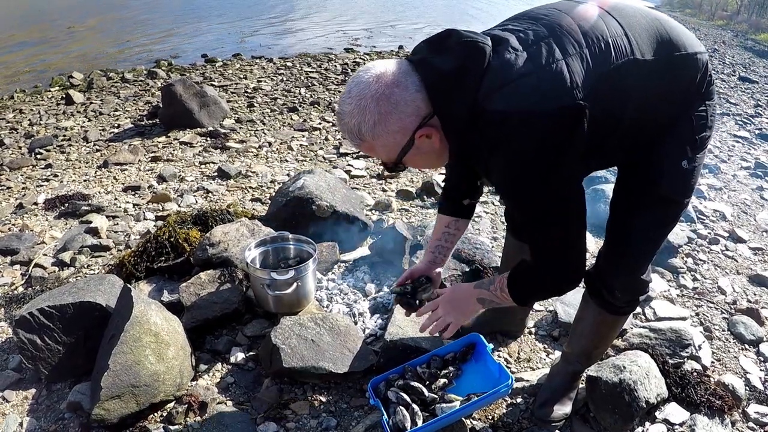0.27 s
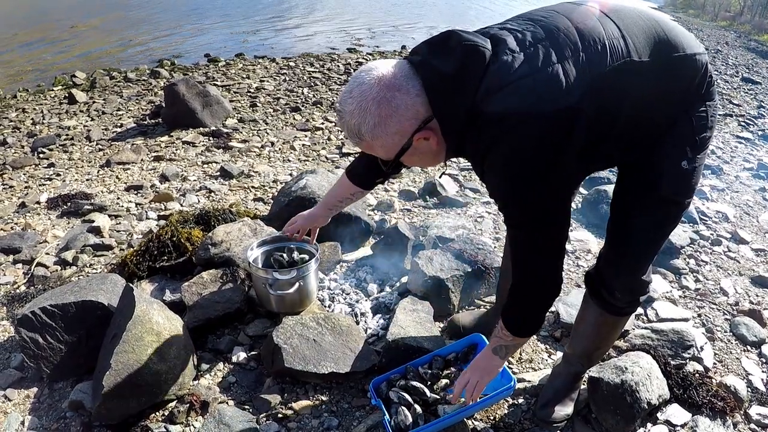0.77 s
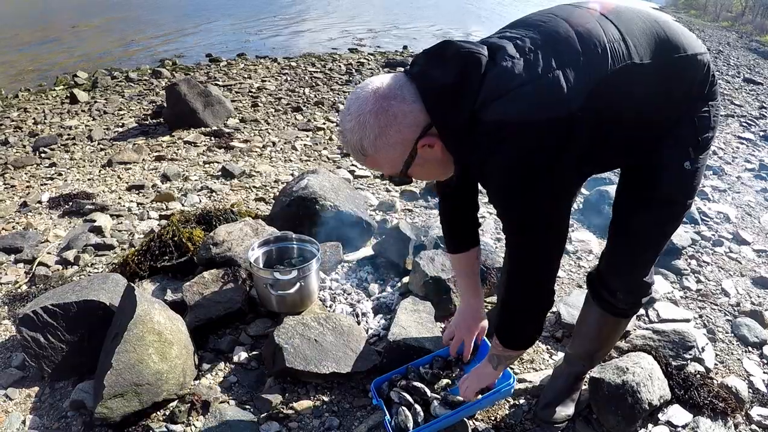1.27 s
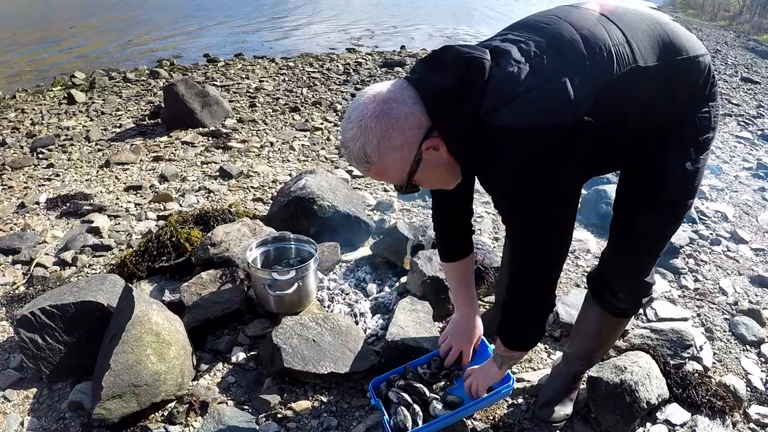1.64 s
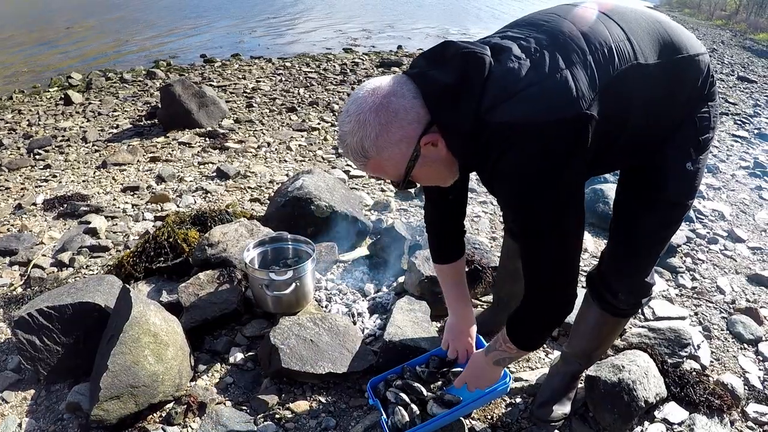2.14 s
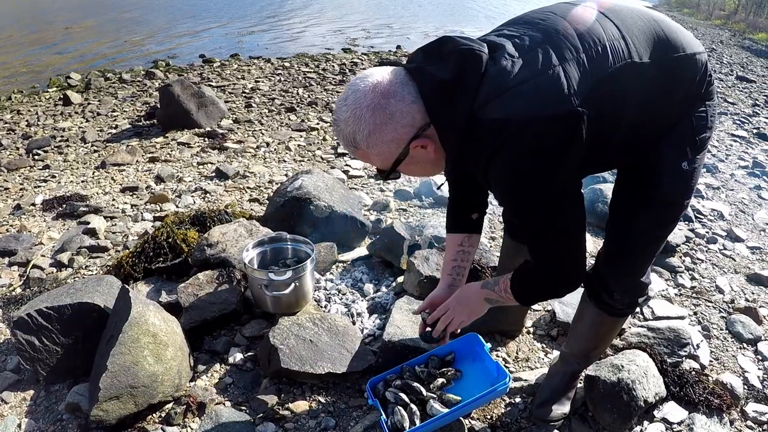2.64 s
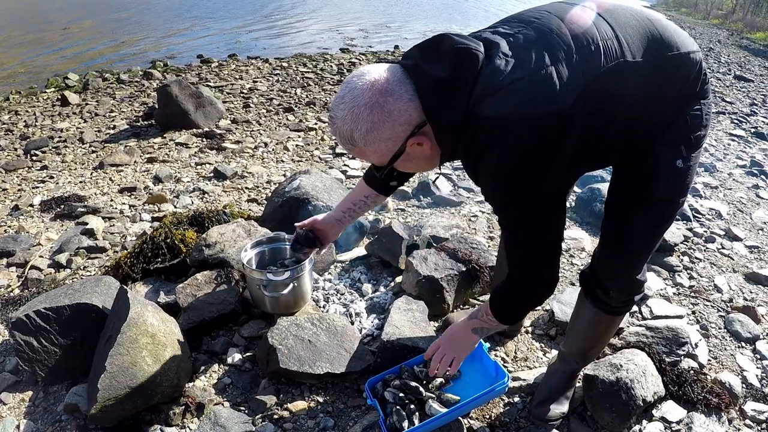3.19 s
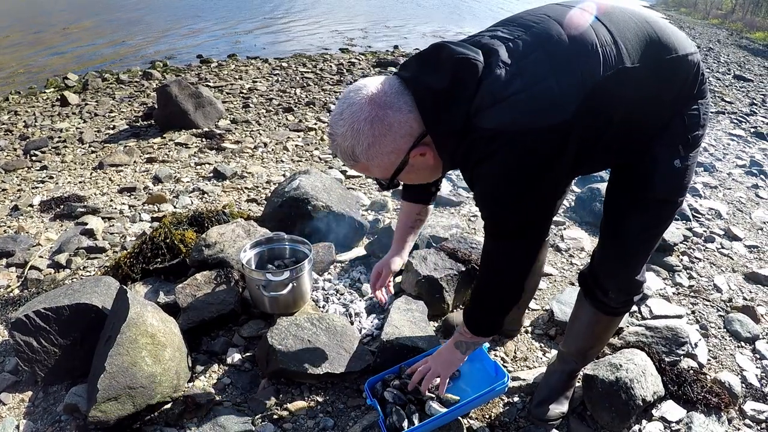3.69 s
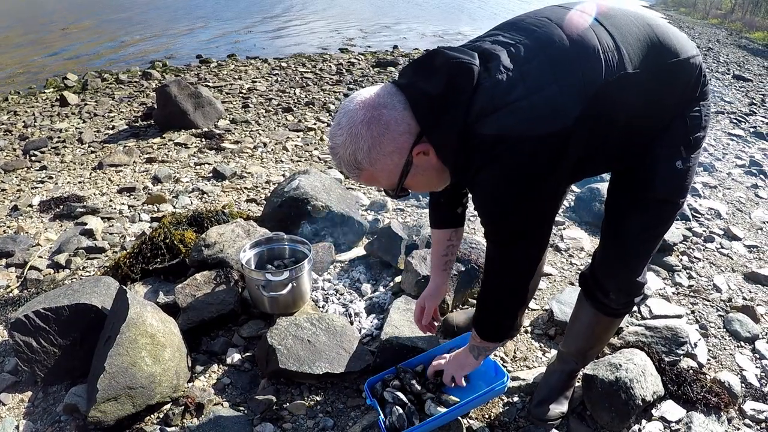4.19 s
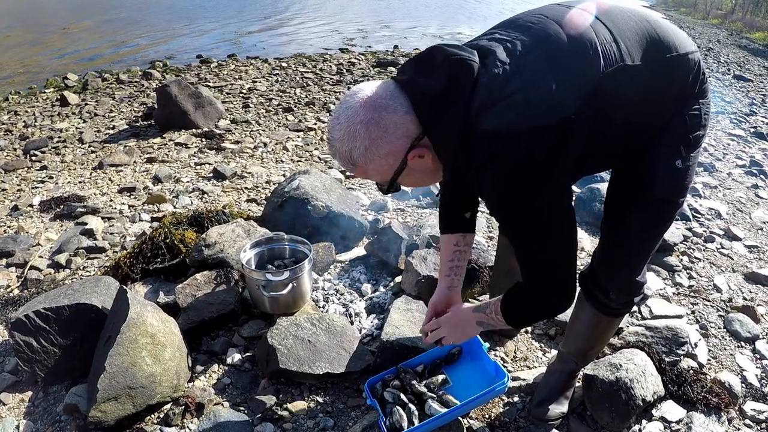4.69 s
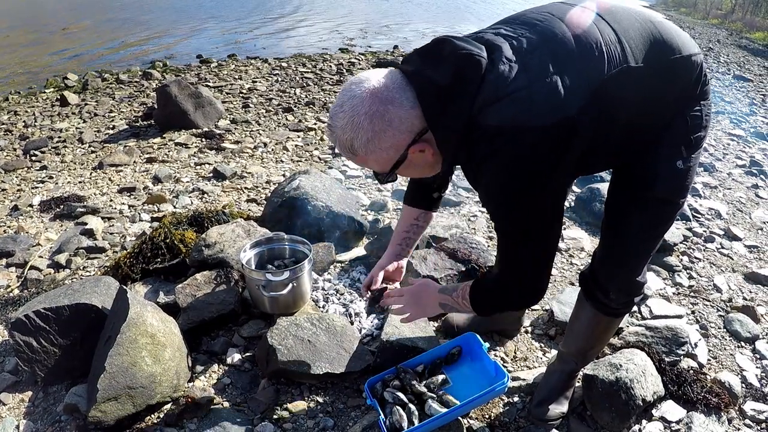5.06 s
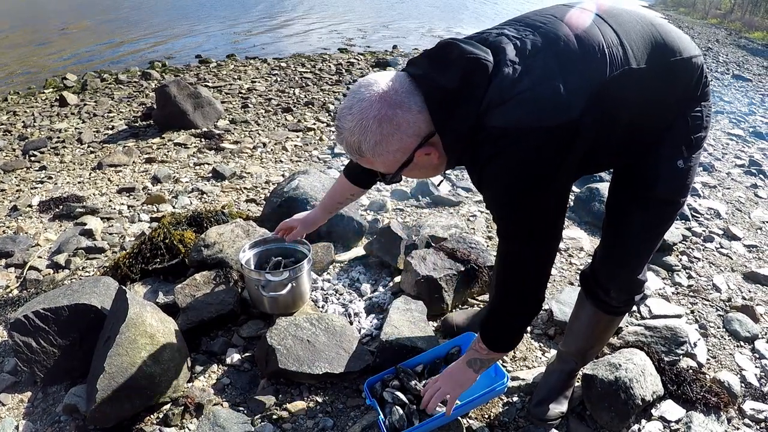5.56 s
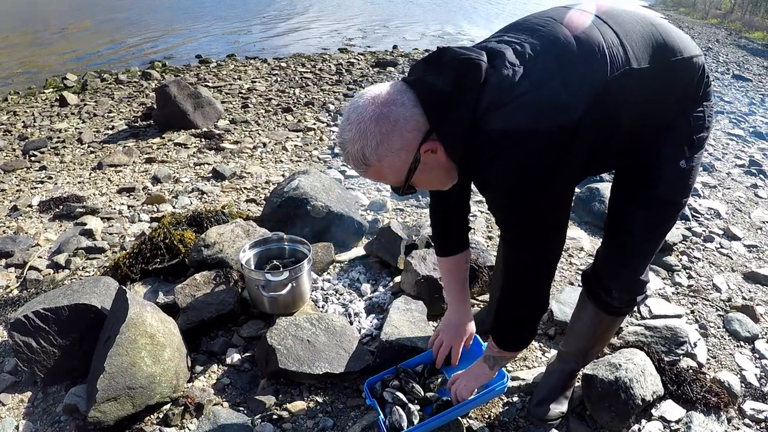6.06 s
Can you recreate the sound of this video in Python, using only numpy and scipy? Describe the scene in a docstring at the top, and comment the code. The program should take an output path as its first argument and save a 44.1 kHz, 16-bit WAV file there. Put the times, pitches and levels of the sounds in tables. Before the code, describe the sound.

A close stereo outdoor recording on a stony shore. It opens with heavy low wind rumble and ragged gusts buffeting the microphone. At about 0.8 s a handful of mussels crashes into a steel pot: a dense cluster of sharp cracks, bright rattle and short metallic ring, with last shells landing near 1.0 s. Dull shell clacks follow from 1.1 to 1.7 s, then firmer knocks on a plastic tub around 2.1 to 2.3 s. The gusts stop by 2.5 s, leaving fading rumble, occasional soft thumps of wind and a distant engine drone near 60 Hz. A second handful clatters into the pot at 3.4 to 3.7 s. Hollow clacks and scrapes in the tub run from 3.8 to 4.5 s. A shorter, more muffled third drop comes at 5.5 to 5.65 s, then quick light tub rummaging until the end at 6.3 s, as the drone weakens over faint hiss and water wash.

```python
"""Mussels into a steel pot

On a stony shore, handfuls of mussels go from a plastic tub into a steel pot three times. Noise bursts and
decaying modes make shells clack, scrape and knock the tub and ring the pot close to the microphones. Shaped
noise buffets the two ports as wind and dies away, uncovering the drone of a distant engine, built from
harmonics, and a soft noise hiss over the wash of water."""
import sys
import numpy as np
from scipy import signal
from scipy.fft import rfft, irfft, next_fast_len
from scipy.io import wavfile
from scipy.ndimage import uniform_filter1d

SR = 44100
rng = np.random.default_rng(int(sys.argv[2]) if len(sys.argv) > 2 else 0)


def pcm_store(signal):
    """Save signal as 16-bit PCM."""
    levels = np.round(np.clip(np.atleast_2d(signal), -1, 1) * 32767)
    wavfile.write(sys.argv[1], SR, levels.astype(np.int16).T)


N = 279153
TIME = np.arange(N) / SR
RING = np.arange(SR // 3) / SR  # time within one struck sound, s

# shells landing in the pot: start_s, level_db (before the pot's trim),
# hardness_db (middle register over the low), struck_spot_hz
POT_HITS = [(0.821, -24, -1.5, 1250), (0.829, -17.5, 2.5, 1600), (0.8336, -18, -14, 980),
            (0.842, -19.5, 18, 2020), (0.864, -22, -6, 1250), (0.871, -27, -6, 600), (0.885, -25, -3, 3550),
            (0.981, -29.5, -1.5, 970), (1.017, -31, 4.5, 2600), (3.362, -18, -9.5, 1070),
            (3.393, -22.5, 2, 1590), (3.411, -18.5, -8, 1190), (3.418, -15.5, 5.5, 3300),
            (3.474, -26.5, -0.5, 4910), (3.613, -25, 4.5, 3680), (3.657, -37, -6, 1000),
            (5.523, -25.5, -2, 1020), (5.569, -28.5, -6.5, 2450), (5.594, -21.5, -2.5, 1495),
            (5.649, -39, -8, 974)]
# resonances of the plastic tub: pitch_hz, level_db (relative), t60_s
TUB_MODES = [(335, 0, 0.069), (554.3, 5, 0.052), (675, 3, 0.041), (830, -2.5, 0.044), (1133, 0, 0.037),
             (1305, -2.5, .036), (1840, -8.5, 0.045), (2465, -8, 0.051)]

POT_PAN_DB, TUB_PAN_DB = 2, -2.5  # left minus right
TUB_SPOT_DB = 7  # lift of the tub modes near the note of the spot


def undb(db):
    """Decibels to gain."""
    return 10 ** (np.asarray(db) / 20)


def unit(x):
    """Scale to rms 1."""
    return x / np.sqrt(np.mean(x ** 2) + 1e-20)


def curves(table):
    """The columns of a table after the first, joined by straight lines in time."""
    s, *columns = np.transpose(table)
    return [np.interp(TIME, s, c) for c in columns]


def pan(db):
    """Left and right gains for a level difference, at constant power."""
    return np.sqrt(2 / (1 + undb(np.array([-2 * db, 2 * db])))).reshape(2, -1)


def add(out, s, sound):
    """Mix a sound in from time s."""
    i = int(s * SR)
    out[:, i:i + sound.shape[1]] += sound[:, :N - i]


def walk(rate):
    """Random levels held 1 / rate s and smoothed twice; spread 1."""
    k = int(SR / rate)
    steps = np.repeat(rng.standard_normal(N // k + 1), k)
    smooth = uniform_filter1d(uniform_filter1d(steps, k), k)
    return unit(smooth[:N])


def filter_bins(size):
    """Frequencies of a transform in Hz, kept above zero for the logarithm."""
    return np.maximum(np.fft.rfftfreq(size, 1 / SR), 1)


def noise(colour):
    """Two unrelated noises with the given spectrum, together at rms 1."""
    hz, db = np.transpose(colour)
    size = next_fast_len(N)
    gain = undb(np.interp(np.log(filter_bins(size)), np.log(hz), db))
    spectrum = rfft(rng.standard_normal((2, size))) * gain
    return unit(irfft(spectrum, size)[:, :N])


def soften(x, hz):
    """A low-pass: a contact of finite length leaves out the highest treble."""
    return signal.sosfilt(signal.butter(2, min(hz, .45 * SR), fs=SR, output="sos"), x)


def widen(pair, side_db):
    """The direct sound is shared by both ports; the scattered sound enters them with opposite signs."""
    direct, scattered = pair
    return direct + undb(side_db) * np.array([[1], [-1]]) * scattered


def wind():
    """Each port has its own eddies, which swell and die away; strong gusts add a ragged flutter higher up."""
    # slow eddies at the ports: time_s, level_db (before swell and pan)
    eddies = [(0, -17), (1.3, -19.5), (1.55, -23), (2.3, -19.5), (2.6, -27), (4.2, -29.5), (4.55, -34.5),
              (6.33, -40)]
    # spectrum of the eddies: pitch_hz, density_db_per_hz (relative)
    rumble_colour = [(15, -11), (45, -3.5), (90, -5), (140, -9.5), (220, -19), (400, -45), (900, -120)]
    # gusts tearing at the ports: time_s, strength_db (before the flutter's lift)
    gusts = [(0.0, -25), (0.11, -21), (0.28, -38), (0.31, -26.5), (0.53, -35), (0.65, -25), (0.83, -42),
             (0.9, -17.5), (1.04, -23.5), (1.14, -19), (1.19, -24.5), (1.35, -21), (1.44, -23),
             (1.5, -29.5), (1.6, -33.5), (1.7, -30), (2.39, -32.5), (2.44, -58), (2.5, -48)]
    # spectrum of the flutter: pitch_hz, density_db_per_hz (relative)
    gust_colour = [(50, -5.5), (115, 3), (200, -4), (300, -9.5), (450, -23), (700, -31), (3000, -57.5)]
    # spectrum of the buffets: pitch_hz, density_db_per_hz (relative)
    buffet_colour = [(150, -26), (270, 1.5), (400, -4), (520, -12.5), (750, -22.5), (1500, -69)]
    # lone puffs on one port: centre_s, level_db, port (0 left, 1 right), pitch_hz
    puffs = [(0.884, -7, 0, 105), (1.225, -17.5, 0, 115), (1.635, -7.5, 1, 88), (1.825, -5.5, 1, 61),
             (2.53, -9, 0, 52), (3.676, -11, 0, 118), (4.646, -12.5, 1, 100)]
    windward_db, gust_pan_db = 3, 4  # left minus right
    eddy_db, gust_lift_db = 2, 6.5  # spread of each port's swell; lift of the flutter
    gust_release_s = 0.03  # time constant of the last gust
    buffet_db, buffet_growth = -27.5, 2.13  # level in a gust of -19 dB; dB more for each dB of gust
    puff_cycles = 1  # from a puff's centre to where its envelope falls to 1 / e

    rumble_db, = curves(eddies)
    swell_db = eddy_db * np.array([walk(rate=5.02), walk(rate=5.08)])
    out = noise(rumble_colour) * undb(rumble_db + swell_db) * pan(windward_db)

    ragged = unit(undb(3.5 * np.array([walk(rate=50), walk(rate=50)])))
    dying = np.exp(-np.maximum(TIME - gusts[-1][0], 0) / gust_release_s)
    gust_db, = curves(gusts)
    flutter = soften(noise(gust_colour), hz=6000) * ragged * dying
    out += flutter * undb(gust_db + gust_lift_db) * pan(gust_pan_db)

    # the strongest gusts break into fast lumps that push on one port and pull on the other
    lumps = unit(undb(3.5 * walk(rate=45)))
    buffet = widen(noise(buffet_colour), side_db=11) * lumps * dying
    out += buffet * undb(buffet_db + buffet_growth * (gust_db + 19.0)) * pan(gust_pan_db)

    for s, db, port, hz in puffs:
        # one eddy rolls over the port: a couple of slow pressure swings
        envelope = np.exp(-((TIME - s) * hz / puff_cycles) ** 2)
        swing = np.sin(2 * np.pi * hz * (TIME - s)) * envelope
        out[int(round(port))] += undb(db) * swing
    return out


def engine():
    """Distant firing harmonics dip a little, then rise, wavering in moving air; the lowest two fade first."""
    # the drone: time_s, level_db (before the harmonics' own levels), bass_db (lowest two), firing_hz
    drone_course = [(0, -32.5, 4.5, 59.66), (2.9, -27.5, -3.5, 59.45), (4.2, -27, -7.5, 59.91),
                    (5.2, -34.5, -4, 60.33), (5.8, -34.5, -14, 60.52), (6.33, -38, -19, 60.7)]
    # harmonics of the firing rate: multiple, level_db (relative)
    harmonics = [(1, -0.5), (2, 3), (3, -8), (4, -12.5), (5, -24.5)]
    db, bass_db, firing_hz = curves(drone_course)
    wavering_hz = firing_hz * (1 + 0.0012 * walk(rate=3.94))
    phase = 2 * np.pi * np.cumsum(wavering_hz) / SR
    drone = 0
    for k, order_db in harmonics:
        gain = undb(order_db + bass_db * (round(k) <= 2) + 1.85 * walk(rate=4.62))
        # each harmonic reaches the two ports with its own lag, in radians
        lag = np.array([[1], [-1]]) * 0.18 * rng.standard_normal()
        drone = drone + gain * np.sin(round(k) * phase + 2 * np.pi * rng.random() + lag)
    return drone * undb(db) * pan(db=-3.0)


def shore():
    """A steady noise wash of water, a noise hiss whose level changes over time, and a faint thin whine."""
    # the hiss: time_s, level_db (before its lift and flicker)
    hiss_course = [(0, -54), (.9, -48.5), (1.15, -58.5), (2.0, -53), (2.5, -60.5), (4.5, -64), (6.33, -65)]
    # spectrum of the hiss: pitch_hz, density_db_per_hz (relative)
    hiss_colour = [(300, 13), (1200, 15), (2500, 4), (4500, 4), (7300, 5), (9500, -1.5), (11000, -10.5),
                   (15000, -76)]
    # spectrum of the water: pitch_hz, density_db_per_hz (relative)
    wash_colour = [(100, 12.5), (300, 8), (900, 1.5), (1600, -2.5), (3000, -11), (5000, -19), (8600, -13),
                   (11500, -19), (15000, -26)]
    # narrow spectrum of the whine: pitch_hz, density_db_per_hz (relative)
    whine_colour = [(8200, -53), (8540, -26), (8625, 5), (8710, -18), (9100, -45)]
    wash_db, whine_db = -48.5, -73
    hiss_db, = curves(hiss_course)
    wash = widen(noise(wash_colour), side_db=0.0) * undb(wash_db + 0.67 * walk(rate=4.44))
    hiss = noise(hiss_colour) * undb(hiss_db + 8.0 + .5 * walk(rate=24)) * pan(db=-4.0)
    return wash + hiss + noise(whine_colour) * undb(whine_db)


def fade(t60):
    """Free decay of a struck thing: 60 dB down after t60 seconds."""
    return np.exp(-np.log(1000) * RING / t60)


def modes(table):
    """One decaying sine for each mode."""
    return np.array([undb(db) * fade(t60) * np.sin(2 * np.pi * hz * RING) for hz, db, t60 in table])


def favour(table, hz, lift_db):
    """The modes as one spot excites them: those near its note stand out."""
    spot_octaves = 0.23  # reach of the spot
    return [(f, db + lift_db * np.exp(-(np.log2(f / hz) / spot_octaves) ** 2), t60)
            for f, db, t60 in table]


def strike(rings, scatter_db):
    """A contact excites modes with random strengths and signs, drawn apart for direct and scattered sound."""
    shape = (2, len(rings))
    signs = rng.choice([-1, 1], shape)
    return (signs * undb(scatter_db * rng.standard_normal(shape))) @ rings


def burst(t60):
    """Modes too dense to tell apart: a pair of decaying noises."""
    return rng.standard_normal((2, len(RING))) * fade(t60)


def registers(db, hard_db, tick_db, slope):
    """Low, middle and high level of a blow: a harder contact moves its energy upwards."""
    shape = np.array([-hard_db, 0, tick_db + slope * hard_db])
    return db + shape - 20 * np.log10(np.linalg.norm(undb(shape)))


def voice(sound, levels):
    """Weight and hardness of a blow set the low, middle and high register of its first 10 ms."""
    # low, middle and high register: bottom_hz, top_hz
    register_edges = [(360, 1700), (1700, 5000), (5000, 14000)]
    out = 0
    for edges, db in zip(register_edges, levels):
        band = signal.sosfilt(signal.butter(3, edges, "bandpass", fs=SR, output="sos"), sound)
        onset_rms = np.sqrt(np.mean(band[:, :SR // 100] ** 2))
        out = out + undb(db) * band / onset_rms
    return out


def pot():
    """A shell cracks on steel and rocks to rest; the pot rings briefly under the other shells' rattle."""
    # resonances of the steel pot, damped by its shells: pitch_hz (before detuning), level_db (relative), t60_s
    pot_modes = [(385, -3, 0.23), (575, 4, 0.087), (822, 5.5, 0.051), (985, 10, 0.11), (1083, 5, .08),
                 (1506, 5, .09), (1953, 3, 0.21), (2405, 9, 0.15), (2444, 10.5, 0.19), (2574, 7.5, 0.22),
                 (3040, 3, 0.17), (3500, 12.5, 0.13), (3650, 9, 0.12), (3740, 5, 0.16), (3820, 9.5, 0.34),
                 (3960, -1, 0.27), (4200, 6, 0.17), (4930, -14, 0.4)]
    # extra damping as the heap grows and muffles the steel: time_s, t60_s
    pot_muffle = [(3.5, 0.97), (5.5, 0.48)]
    spot_db = 6  # lift of the modes near the note of the spot
    # the shells that a landing shakes, others each time: centre and spread of pitch, level, decay
    heap_hz, heap_octaves, heap_db, heap_t60_s = 5450, 0.46, 3, 0.078
    # treble over the middle register; dB more for each dB of hardness
    tick_db, tick_slope = -7.5, 0.18
    # mean time between rocks from edge to edge; level of the first; loss at each one after
    bounce_s, bounce_db, bounce_loss_db = 0.007, -13.5, 1
    chatter_spread_db = 3
    out = np.zeros((2, N))
    for s, blow_db, hard_db, note_hz in POT_HITS:
        # the shifting load of shells detunes the wall a little at each blow
        wall = [(hz * (1 + .012 * rng.standard_normal()), db, t60)
                for hz, db, t60 in favour(pot_modes, note_hz, spot_db)]
        heap = [(heap_hz * 2 ** (heap_octaves * z), heap_db, heap_t60_s)
                for z in rng.standard_normal(size=10)]
        ring = strike(modes(wall + heap), scatter_db=2)
        ring = ring * fade(np.interp(s, *np.transpose(pot_muffle)))

        # the small shells rattle in the treble; the low notes belong to the pot
        rattle = undb(23.0) * burst(t60=0.12) + undb(15) * burst(t60=0.011)
        rattle = signal.sosfilt(signal.butter(1, 1500, "highpass", fs=SR, output="sos"), rattle)

        # loose shells chatter on the steel and roughen its ring
        chatter = undb(chatter_spread_db * walk(rate=420)[:len(RING)] * (1 - fade(.05)))
        levels = registers(blow_db, hard_db, tick_db, tick_slope)
        landing = (ring + soften(rattle, hz=7000)) * chatter
        add(out, s, voice(widen(landing, side_db=-9.5), levels))
        delays = np.cumsum(bounce_s * (.5 + rng.random(size=3)))
        for k, delay in enumerate(delays):
            bounce = voice(widen(soften(burst(t60=0.029), hz=7050), side_db=2), levels)
            add(out, s + delay, undb(bounce_db - k * bounce_loss_db) * bounce)
    return out * pan(db=POT_PAN_DB) * undb(-2.5)


def clacks():
    """Two shells graze, then meet: a sharp crack, their own brief ring, and a knock from the tub's modes."""
    # shell against shell: start_s, level_db, hardness_db (middle register over the low), shell_hz
    meetings = [(0.844, -28.5, 4, 6400), (0.887, -31, 5, 3830), (1.131, -35, -10, 1300),
                (1.237, -28.5, -14, 1710), (1.255, -39, -8, 1740), (1.375, -37, -6, 3600),
                (1.447, -34, -11, 1810), (1.572, -38, -10, 1270), (1.664, -36.5, -11, 1250),
                (2.105, -27.5, -4.5, 2990), (2.15, -22, -9, 1650), (2.318, -34.5, -12.5, 910),
                (3.36, -21, 15.5, 2470), (3.395, -30, 8, 2230), (3.473, -25.5, 6, 3950),
                (3.547, -24.5, 0.5, 1410), (3.579, -37, -8, 1250), (3.837, -36, 1.5, 2270),
                (3.881, -36, -18, 950), (3.914, -28.5, -18, 1257), (4.17, -30.5, -21, 1198),
                (4.262, -32.5, -13, 1180), (4.274, -32.5, -14, 1260), (4.365, -34, -8.5, 1140),
                (4.443, -32, -11, 1170), (4.955, -34, 37, 4620), (5.532, -20, 18.5, 6210),
                (5.724, -35.5, 4.5, 3907), (5.736, -43, -10, 597.6), (5.775, -40, -16, 698),
                (5.823, -36, -20, 690), (5.843, -30.5, -30, 950), (5.859, -40, -14, 1001),
                (5.899, -40.5, -6.5, 1328), (5.927, -39, -18, 1294), (5.943, -40.5, -2, 1320),
                (6.011, -43.5, 20, 4687), (6.129, -32, -13, 1320), (6.234, -34, -13, 1149)]
    # treble over the middle register; dB more for each dB of hardness
    tick_db, tick_slope = -20, 0.48
    # shells graze this long before they meet squarely; less so in a hard blow
    graze_s, graze_db = 0.0035, -19.5
    over_pot_s = .02  # a clack this close in time to a landing is at the pot
    out = np.zeros((2, N))
    for s, db, hard_db, hz in meetings:
        # pitch_hz, level_db, t60_s
        shell = modes([(hz, 0, .017), (hz * 1.1, -3, .012), (hz * 1.4, -4, .014), (hz * 0.638, -7, .012)])
        ring = strike(shell, scatter_db=2)
        knock = strike(modes(favour(TUB_MODES, hz, TUB_SPOT_DB)), scatter_db=2)

        # the duller the blow, the more of it goes into the tub; the harder, the brighter its crack
        heavy_db, sharp_db = np.clip(-hard_db, 0, 13), max(hard_db, 0)
        crack = undb(0.19 * sharp_db) * burst(t60=0.017) + undb(-12.0) * burst(t60=0.079)
        crack = soften(crack, hz=8340 * undb(0.22 * sharp_db))
        sound = ring + undb(heavy_db - 15.0) * knock + crack
        levels = registers(db, hard_db, tick_db, tick_slope)

        # shells that meet as a handful lands are at the pot; the others are at the tub
        at_pot = any(abs(s - hit[0]) < over_pot_s for hit in POT_HITS)
        place = pan(POT_PAN_DB if at_pot else TUB_PAN_DB)
        add(out, s, voice(widen(sound, side_db=-9.0), levels) * place)
        graze = voice(widen(burst(t60=0.021), side_db=-7), levels)
        add(out, s - graze_s, graze * undb(graze_db - sharp_db) * place)
    return out


def tub():
    """Quick small knocks on the plastic, close together, make short scrapes and single ringing knocks."""
    # short scrapes and single ringing knocks on the tub: start_s, end_s, level_db (before the pan), spot_hz
    scrapes = [(1.686, 1.759, -43.5, 1280), (2.106, 2.112, -28, 555), (2.283, 2.302, -29.5, 555),
               (3.921, 4.004, -36, 740), (4.065, 4.099, -36, 610), (4.095, 4.132, -32, 676),
               (4.264, 4.317, -30.5, 603), (4.319, 4.48, -43, 553), (5.745, 5.8, -41, 671),
               (5.932, 6.001, -41, 339.7), (5.959, 5.974, -30.5, 620), (6.047, 6.09, -39, 480),
               (6.037, 6.12, -43, 2380), (6.087, 6.115, -38.5, 1320), (6.129, 6.155, -36, 545.4)]
    knocks_per_s = 250  # density of the small knocks, besides two more in every row
    shell_spread = 0.087  # share by which the highest mode changes from knock to knock
    out = np.zeros((2, N))
    mode_hz, _, t60 = np.transpose(TUB_MODES)
    for start, end, db, note_hz in scrapes:
        _, mode_db, _ = np.transpose(favour(TUB_MODES, note_hz, TUB_SPOT_DB))
        # the tub's modes sound a little higher or lower each time
        row_hz = mode_hz * (1 + 0.027 * rng.standard_normal(len(mode_hz)))
        contact = np.zeros((2, N))
        count = 2 + int(knocks_per_s * (end - start))
        for place in (np.arange(count) + rng.random(count)) / count:
            # each small knock shifts the high modes more than the low ones
            shift = shell_spread * mode_hz / mode_hz.max() * rng.standard_normal(len(mode_hz))
            knock = strike(modes(zip(row_hz * (1 + shift), mode_db, t60)), scatter_db=3.5)
            grit = undb(3.5) * soften(burst(t60=0.019), hz=3880)
            # the force tends to be greatest midway from start to end
            force = np.sin(np.pi * place) ** .5 * undb(3.5 * rng.standard_normal())
            add(contact, start + place * (end - start), force * widen(knock + grit, side_db=-13.0))
        # the energy is set as if it all lay between start and end
        out += undb(db) * unit(contact) * np.sqrt((end - start) * SR / N)
    return out * pan(db=TUB_PAN_DB)


def housing(x):
    """The body around the microphones shades its two ports differently at each pitch."""
    # shading of sound from the front: pitch_hz, left_minus_right_db
    shading = [(600, 0.5), (950, -1), (1400, 2.5), (2200, 5), (3700, -3.5), (6300, 8), (9500, -7.5)]
    hz, db = np.transpose(shading)
    size = next_fast_len(N)
    gains = pan(np.interp(np.log(filter_bins(size)), np.log(hz), db))
    return irfft(rfft(x, size) * gains, size)[:, :N]


def scene():
    """Shells, pot and tub close in front of the microphones, amid the wind, the engine and the shore."""
    surroundings = wind() + engine() + shore()
    return housing(pot() + clacks() + tub()) + surroundings


def record(dry):
    """The microphones round the strongest peaks, dull the treble and cut the top."""
    rounded = dry / (1 + (dry / .92) ** 6) ** (1 / 6)
    top_cut = signal.ellip(8, .2, 70, 14500, fs=SR, output="sos")  # Hz
    return signal.sosfilt(top_cut, soften(rounded, hz=12500))


dry = scene()
out = record(dry)
pcm_store(out)
```